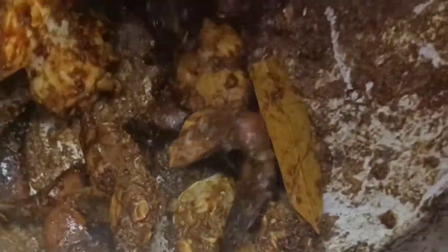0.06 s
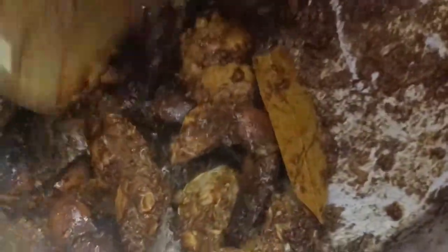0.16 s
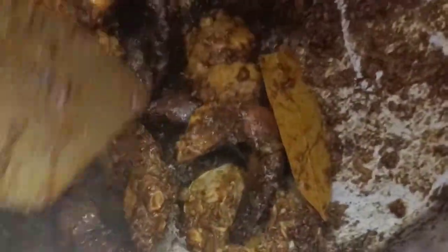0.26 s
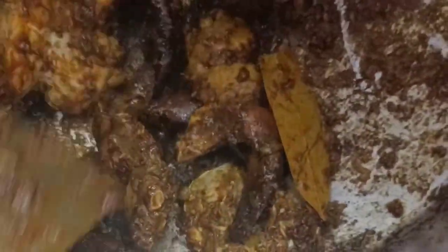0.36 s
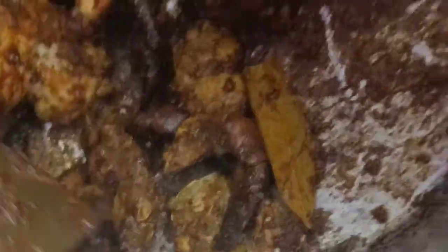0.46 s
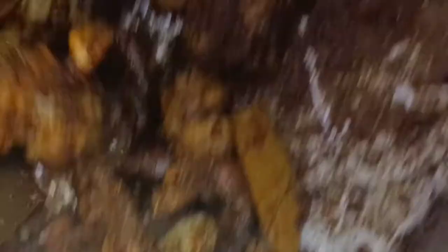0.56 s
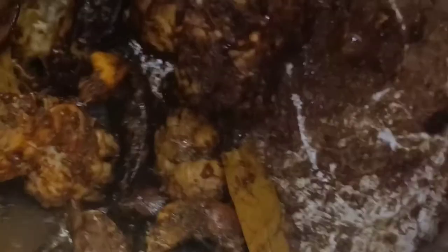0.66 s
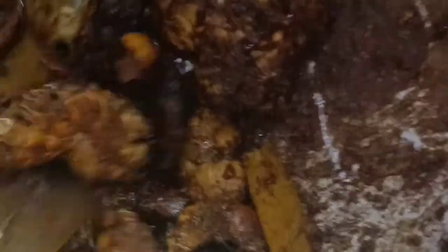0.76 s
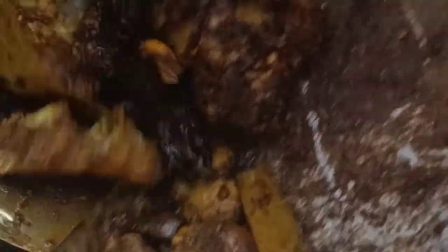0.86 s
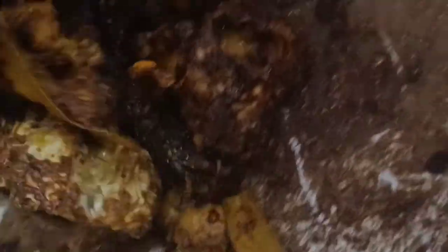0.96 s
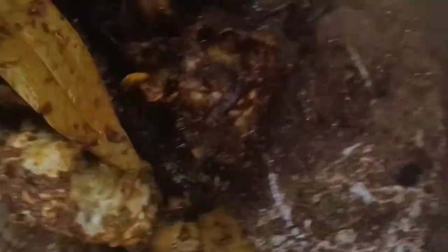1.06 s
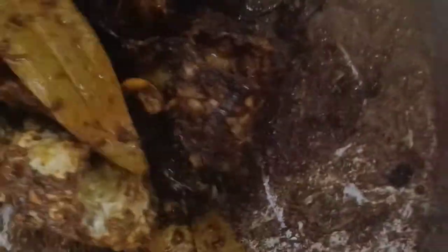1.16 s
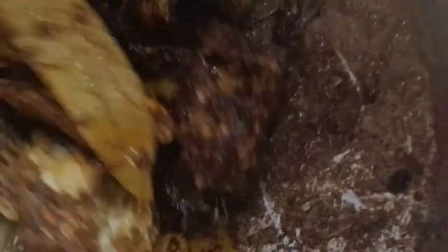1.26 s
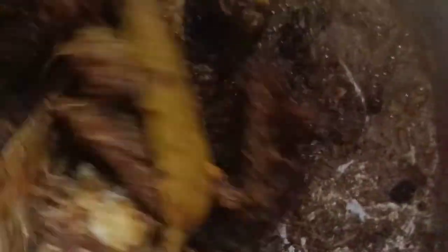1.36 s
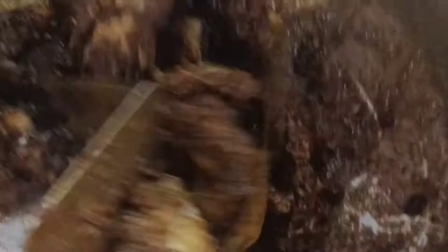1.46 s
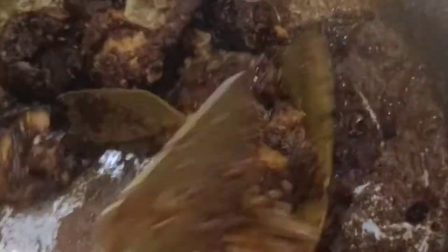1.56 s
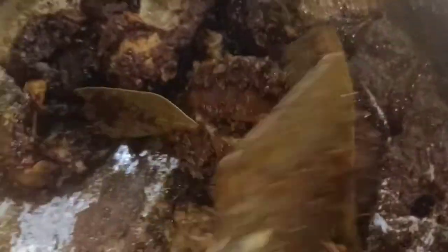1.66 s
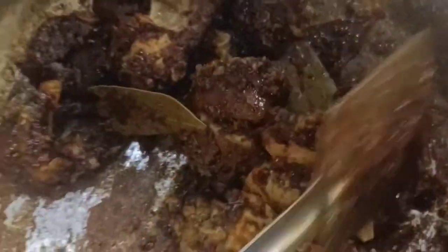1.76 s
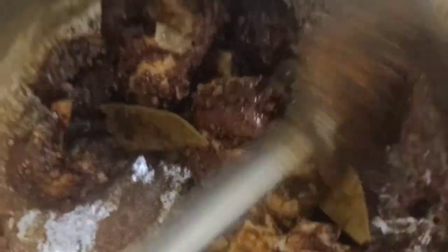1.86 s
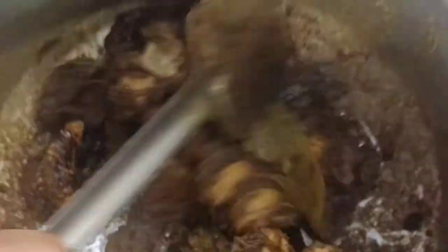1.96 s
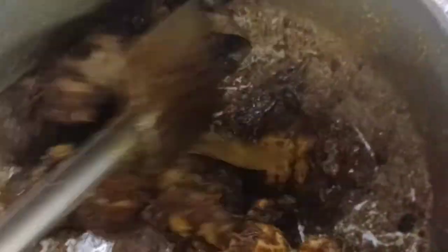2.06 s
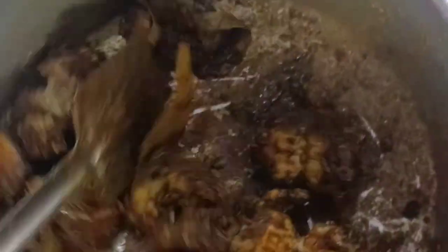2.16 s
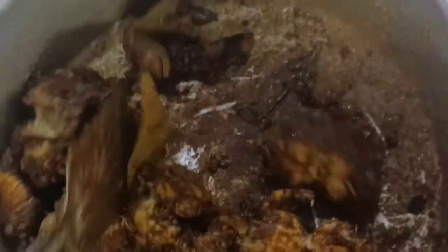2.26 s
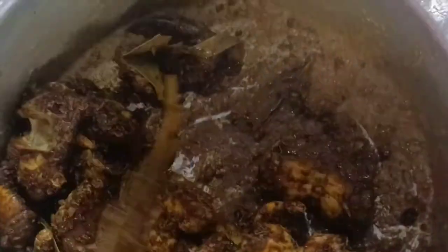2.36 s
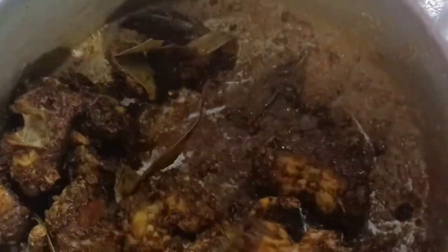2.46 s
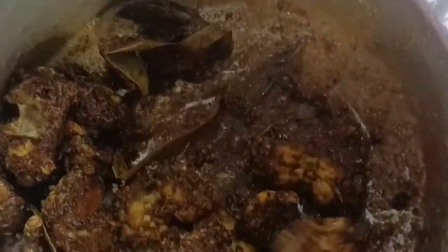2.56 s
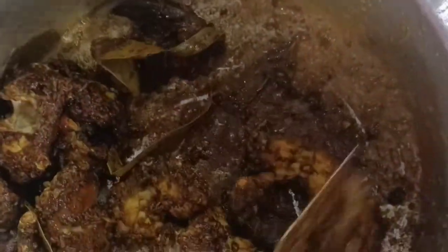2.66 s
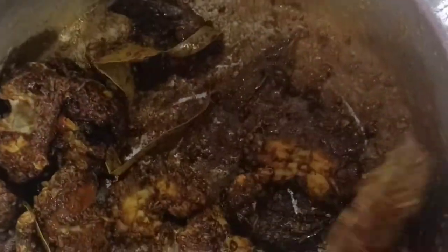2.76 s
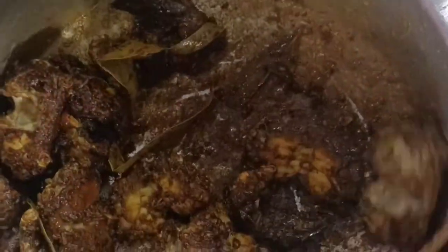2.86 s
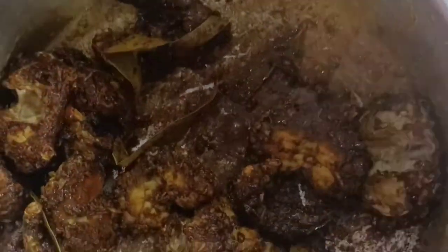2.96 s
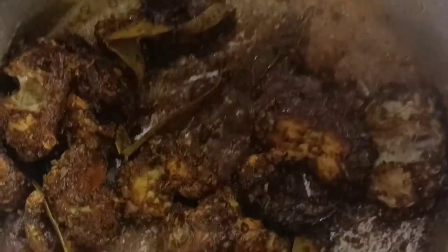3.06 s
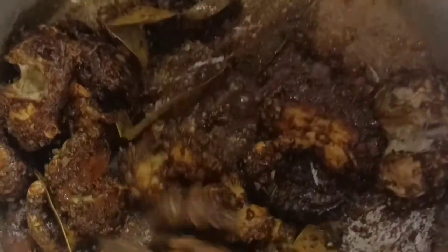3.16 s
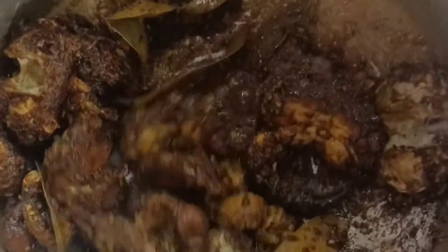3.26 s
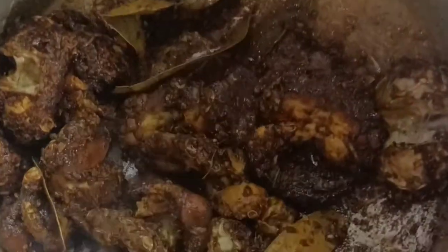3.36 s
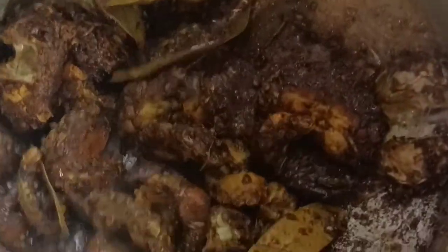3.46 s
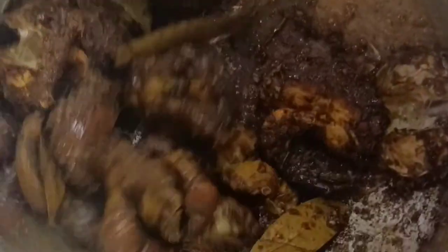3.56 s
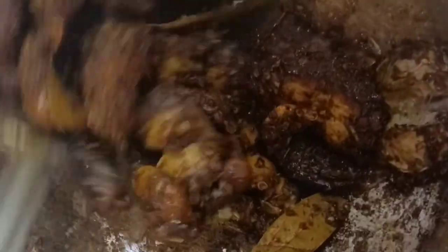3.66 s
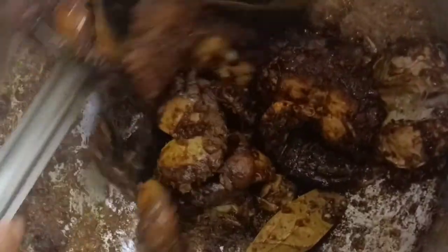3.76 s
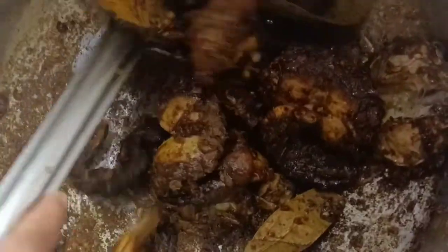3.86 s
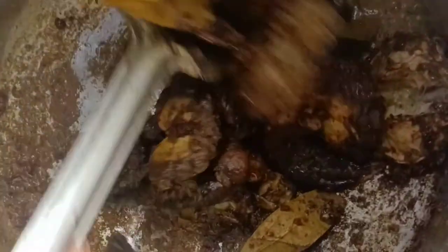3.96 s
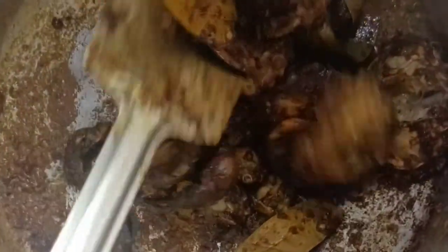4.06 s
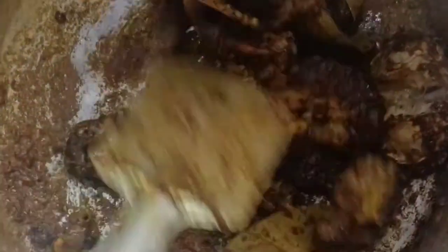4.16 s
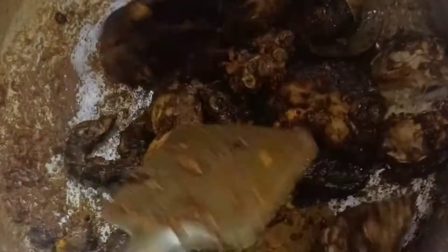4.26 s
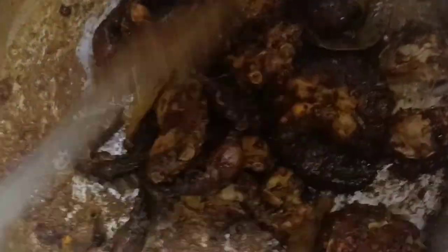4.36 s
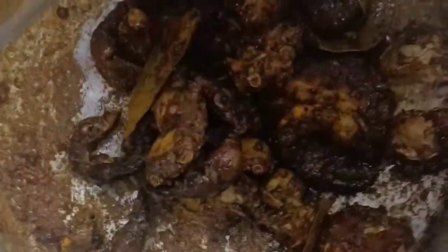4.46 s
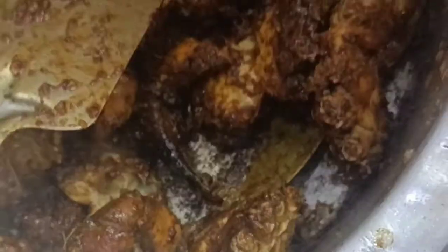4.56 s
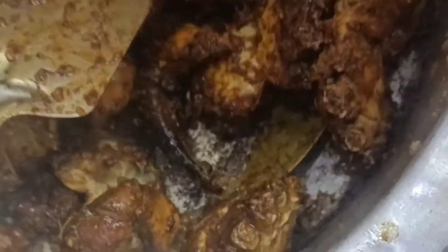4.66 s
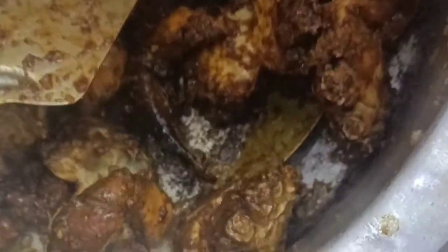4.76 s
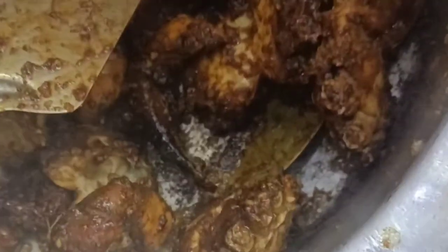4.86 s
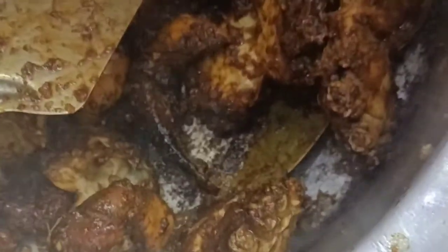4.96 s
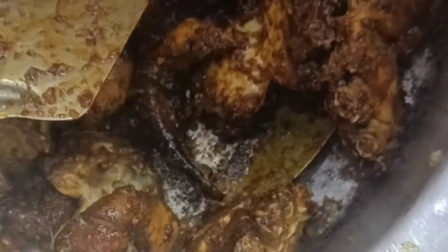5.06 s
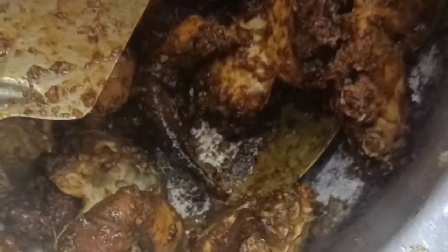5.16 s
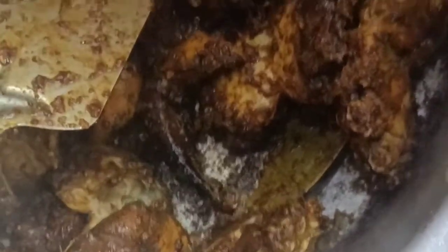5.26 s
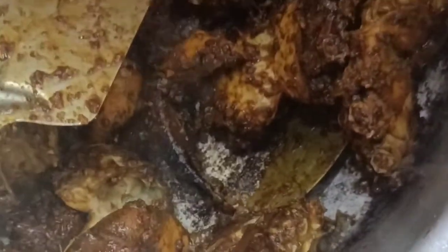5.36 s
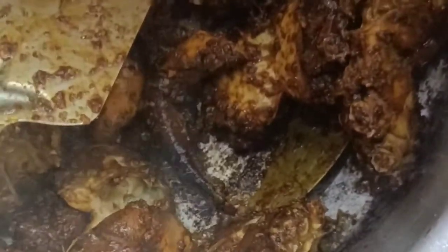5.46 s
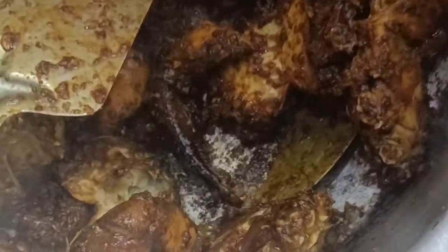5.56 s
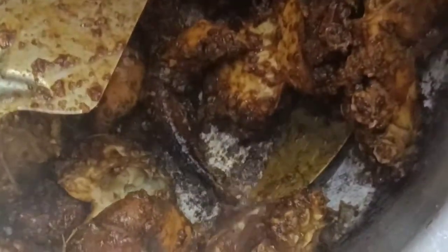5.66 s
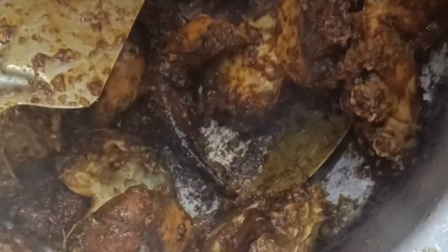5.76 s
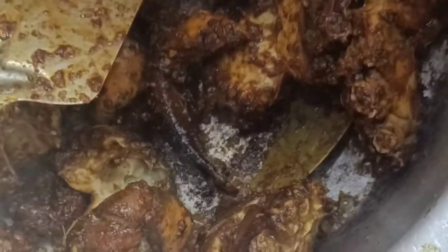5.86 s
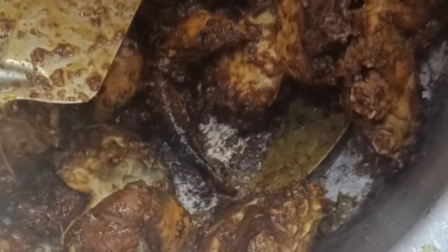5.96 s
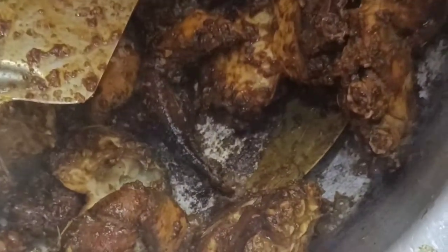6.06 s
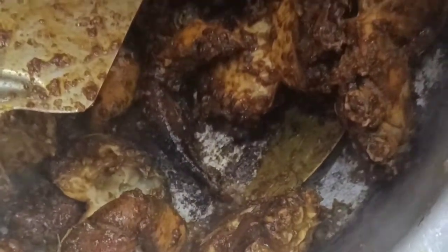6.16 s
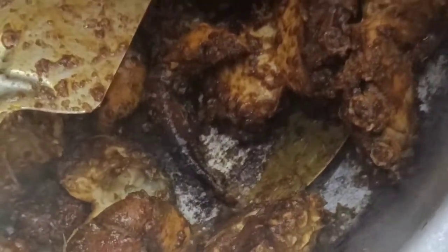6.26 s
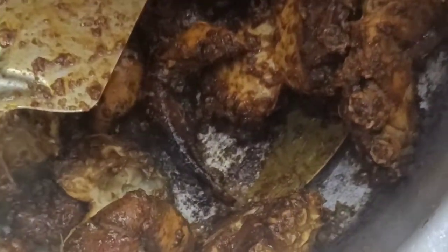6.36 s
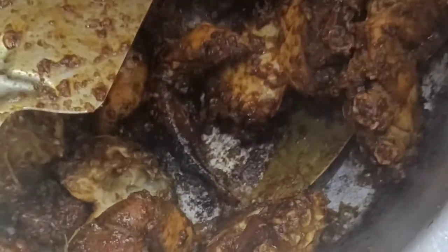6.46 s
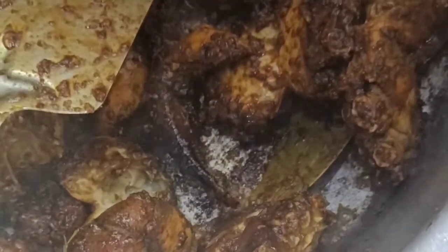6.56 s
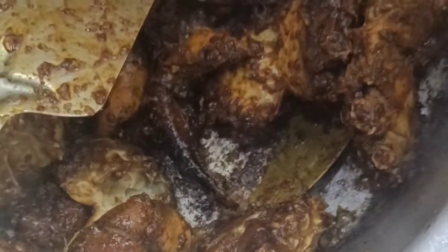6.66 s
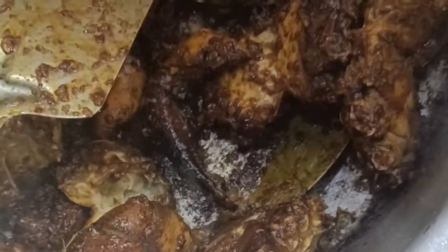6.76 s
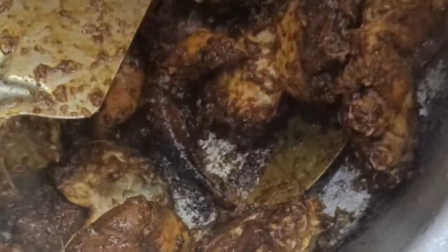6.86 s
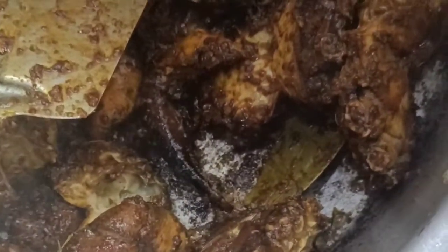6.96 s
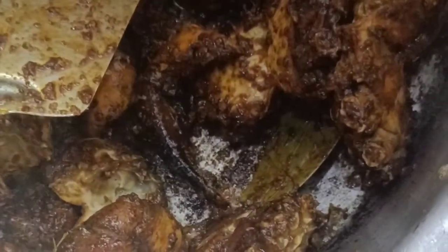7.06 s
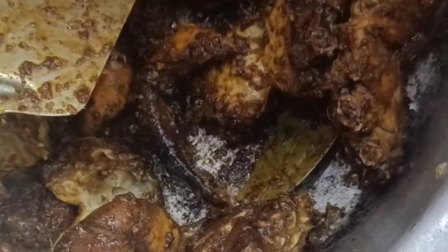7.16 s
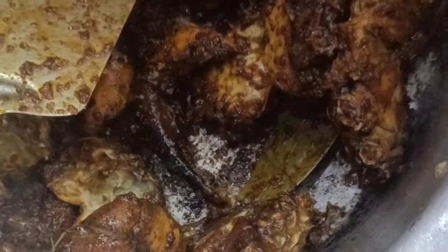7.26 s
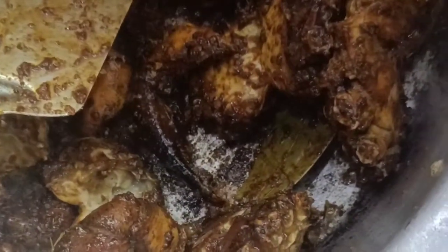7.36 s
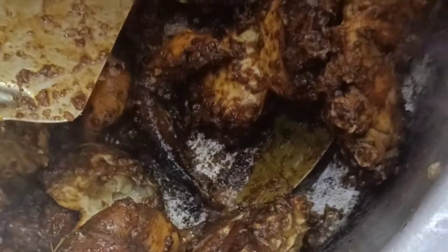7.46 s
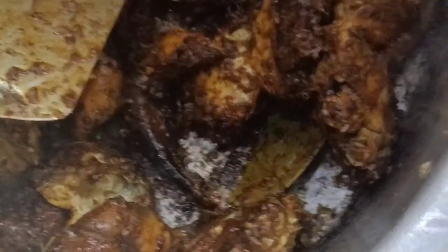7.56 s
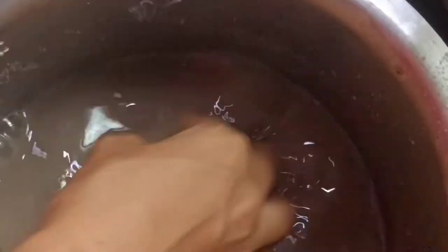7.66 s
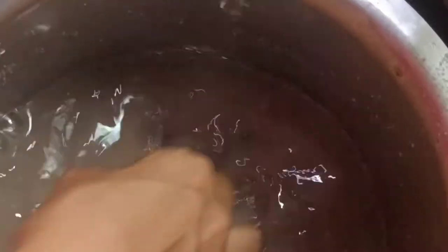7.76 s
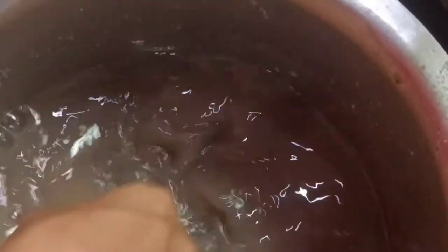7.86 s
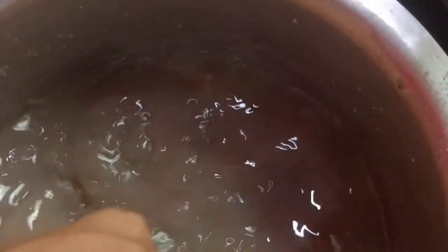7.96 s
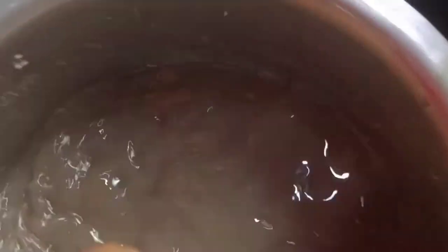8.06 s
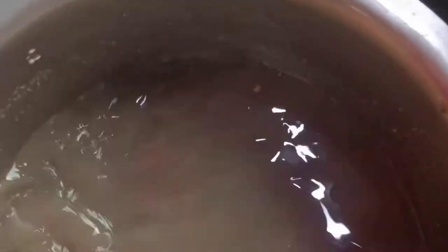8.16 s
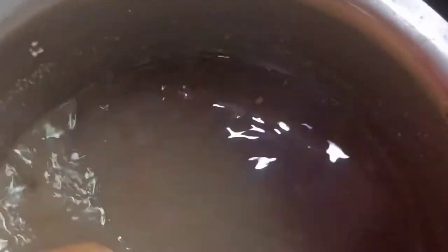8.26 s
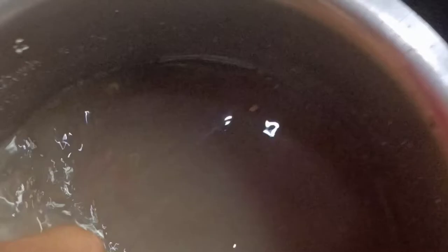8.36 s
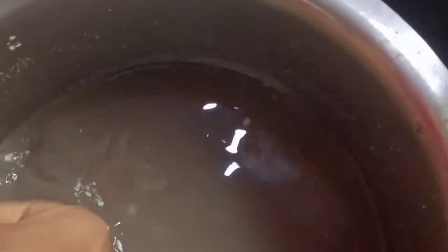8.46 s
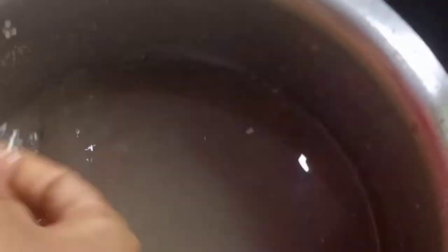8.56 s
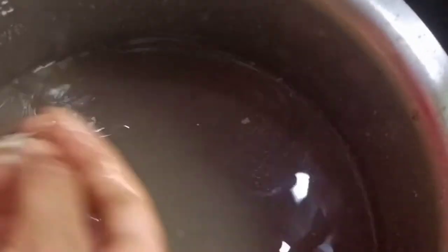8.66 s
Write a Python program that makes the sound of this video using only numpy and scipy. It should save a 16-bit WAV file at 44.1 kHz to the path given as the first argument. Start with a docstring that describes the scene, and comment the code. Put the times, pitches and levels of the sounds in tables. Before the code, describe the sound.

Very close to a deep metal pan, a steel spatula bites, scrapes and clanks over a crusted bottom while pieces of food thud back and oil sizzles steadily. After about four seconds stirring mostly stops; two late scratches, spitting drops and a bright steam hiss on the right follow. The spatula rocks softly on the rim, then the sizzle falls abruptly to a quiet, even simmer.

```python
"""A steel spatula knocks, scrapes and turns curry fries in a deep metal pan close to the microphone.
Bursts of noise ring the modes of pan and blade; the spatula is later laid down and rocks on the rim.
The fries sizzle as countless tiny bursts, drops spit and steam hisses from under the food on the right.
Near the end the frying falls to a quiet simmer; burner rush (shaped noise) and mains hum lie underneath."""
import sys
import numpy as np
from scipy import signal
from scipy.io import wavfile
from scipy.ndimage import uniform_filter1d

SR = 44100
rng = np.random.default_rng(int(sys.argv[2]) if len(sys.argv) > 2 else 0)


def generate_wav(sig):
    """Save sig (samples, or channels by samples) to the path in sys.argv[1] as 16-bit PCM at SR."""
    pcm = np.round(np.clip(np.atleast_2d(sig).T, -1, 1) * 32767).astype(np.int16)
    wavfile.write(sys.argv[1], SR, pcm)


N = 384111
TIME = np.arange(N) / SR   # seconds

# The bare edge bites into the metal. Each row: start in seconds, scratch level in dB, blade resonance
# in Hz, scratch centre in Hz, chatter t60 in seconds, ring t60 in seconds.
EDGE_BITES = [(0.167, -17, 1022, 5770, 0.13, 0.04), (0.381, -25, 1017, 4020, 0.092, 0.17),
              (0.901, -16, 2100, 2860, 0.058, 0.028), (0.921, -24.5, 1320, 3020, 0.028, .04),
              (1.55, -24, 1040, 5100, 0.028, 0.087), (1.66, -16.5, 900, 4970, 0.068, 0.058),
              (1.736, -24, 1180, 5240, 0.036, .06), (1.862, -36.5, 1580, 4950, 0.039, .05),
              (2.21, -30.5, 2160, 4000, 0.013, 0.024), (2.539, -25, 1546, 5240, 0.58, .1),
              (2.577, -18, 907, 6200, 0.079, 0.13), (2.596, -19, 895, 5630, 0.15, 0.14),
              (2.657, -21, 940, 5070, 0.082, 0.044), (2.713, -28.5, 1540, 4700, .12, .06),
              (3.012, -25.5, 1270, 4670, 0.0045, .02), (3.309, -15, 1720, 3830, 0.021, .04),
              (3.332, -18, 1780, 4830, 0.054, .05), (3.875, -21.5, 1520, 3140, 0.039, .03),
              (4.058, -33.5, 2180, 3600, .02, .02), (4.952, -17.5, 1230, 6300, 0.028, 0.036),
              (4.962, -23.5, 1240, 4100, 0.034, .03), (5.087, -20.5, 1430, 4200, 0.066, 0.11)]
# The flat of the blade strikes the bottom. Each row: start in seconds, clank level in dB,
# blade resonance in Hz.
FLAT_CLANKS = [(0.584, -32, 1020), (0.711, -27, 1590), (0.741, -26, 1310), (0.756, -25.5, 1340),
               (0.776, -30, 1640), (0.873, -34.5, 1610), (1.737, -16, 1122), (1.814, -27, 1830),
               (2.719, -25.5, 825), (2.871, -27, 1130), (2.919, -21, 1160), (2.955, -37, 940),
               (2.986, -29.5, 1250), (3.35, -20, 1270), (3.383, -32, 1270), (3.426, -26.5, 2070),
               (3.443, -19, 1260), (3.464, -25, 1680), (3.484, -28, 1460), (3.549, -28, 1540),
               (3.577, -28, 950), (3.9, -25, 1050), (3.909, -18, 1530), (3.981, -29, 1040)]
# Low thuds: pieces of food drop back into the pan; at 1.742 the pan itself thumps on its stand.
# Each row: start in seconds, thud level in dB, thud pitch in Hz.
LOW_THUDS = [(0.181, -41, 336), (0.332, -39, 293), (0.521, -35.5, 278), (0.923, -40, 307),
             (1.161, -38.5, 262), (1.218, -29, 283), (1.472, -28, 310), (1.58, -30.5, 278),
             (1.689, -33, 270), (1.742, -28.5, 98), (2.023, -38, 270), (2.324, -36, 255), (2.838, -35, 320),
             (2.891, -23.5, 385), (2.922, -26, 425), (3.873, -20.5, 325), (3.899, -19.5, 474),
             (4.211, -39, 415)]
# Strokes of the spatula over the bottom. Each row: start in seconds, length in seconds, rise in seconds,
# grating edge in dB, pushed food in dB, blade resonance in Hz, its strength in dB, top of the grating
# in Hz. The three dB columns are before the trims in scraping().
SPATULA_STROKES = [(0.236, 0.086, 0.027, -33, -62, 993, 12, 4500),
                   (0.306, 0.11, 0.015, -35.5, -33, 1910, 11.5, 3500),
                   (0.516, 0.062, 0.048, -30, -35.5, 1950, 21, 2600),
                   (0.566, 0.03, 0.017, -40, -39, 1083, 24.5, 2600),
                   (0.678, 0.05, 0.034, -24.5, -45, 1330, 22, 3230),
                   (1.652, 0.066, 0.011, -24, -22, 915, 19, 4000),
                   (1.756, 0.071, 0.012, -30, -26.5, 1990, 2, 2400),
                   (1.857, 0.013, 0.0067, -26.5, -34.5, 1540, 7, 2600),
                   (2.534, 0.026, 0.0034, -31.5, -42, 1580, 2, 4960),
                   (2.585, 0.14, 0.01, -28.5, -36, 920, -4, 5000),
                   (2.794, 0.22, 0.056, -28.5, -26, 800, 6, 1610),
                   (3.275, 0.19, 0.046, -18.5, -36, 1977, 14, 2420),
                   (3.447, 0.053, 0.014, -25, -26.5, 1860, 8, 2190),
                   (3.523, 0.04, 0.017, -25.5, -34, 1470, 15, 1780),
                   (3.88, 0.15, 0.015, -38, -28.5, 1520, 14, 2220)]
# Modes of the loaded pan. Each row: frequency in Hz, width in Hz, gain in dB.
PAN_MODES = [(246, 7, 9.5), (283, 32, 8.5), (359.7, 21, 5.5), (405, 31, -0.5), (539, 34, -14), (567, 32, 0),
             (732, 92, -3.5), (1000, 80, 5), (1035, 14, -4), (1204, 75, -1.5), (1394, 27, 0.5),
             (1580, 240, 8.5), (1870, 100, 4), (2002, 17, 10), (2400, 210, -28), (2390, 530, 2.5),
             (2740, 17, -18), (3250, 9, 7), (3770, 73, 1), (4580, 61, 8), (4950, 13, 1), (6080, 54, 7),
             (6840, 200, 4), (8300, 24, 4)]
# High modes of the steel blade. Each row: frequency in Hz, width in Hz, gain in dB before bend and spot.
BLADE_MODES = [(2144, 78, 3.5), (2946, 65, 1.5), (3265, 40, 2), (3500, 49, -2), (3770, 48, -5),
               (4220, 84, -9), (4635, 74, -0.5), (5500, 45, -10), (5890, 53, 4), (6370, 200, -1),
               (8360, 100, -1), (8640, 33, 0.5), (9400, 120, -29)]
# The laid-down spatula rocks against the rim. Each row: start in seconds, level in dB,
# chatter t60 in seconds, hardness of the contact as its upper limit in Hz.
RIM_ROCKS = [(6.013, -32.5, 0.26, 290), (6.094, -36, 0.17, 900), (6.204, -33, 0.28, 1600),
             (6.244, -38.5, 0.26, 1900)]
# Modes of its handle. Each row: frequency in Hz, width in Hz of each of two passes, gain in dB.
HANDLE_MODES = [(180, 64, 1.5), (267, 23, 10.5), (683, 33, -0.5), (785, 39, -5), (1160, 40, 1),
                (1340, 80, -14), (1636, 77, -2)]
# Vigour of the frying. Each row: time in seconds, level in dB before FRY_GAIN_DB.
FRYING_VIGOUR = [(0.0, -40), (0.36, -41), (0.59, -40.5), (1.15, -40.5), (1.73, -39.5), (2.07, -42.5),
                 (2.83, -41.5), (3.19, -39), (4.12, -40.5), (4.44, -41.5), (6.27, -41), (6.57, -43),
                 (6.99, -41), (7.15, -43)]
# Colour of the frying ahead of the pan. Each row: frequency in Hz, level in dB per Hz.
FRYING_COLOUR = [(300, -16), (700, -16), (1200, -9.5), (1900, -10.5), (2600, 1.6), (3200, 2.5), (4200, 2),
                 (6000, 4.5), (9000, 0), (12000, 2), (15500, 3.5)]
# Fat or sauce spits with no body. Each row: start in seconds, level in dB, centre in Hz, t60 in seconds.
FAT_SPITS = [(4.918, -20, 11000, 0.033), (5.885, -26, 11000, .008), (5.97, -34, 11000, 0.023),
             (6.039, -16.5, 10000, 0.026), (6.186, -15.5, 7000, 0.01), (6.205, -21.5, 8500, 0.47),
             (6.402, -27, 9500, 0.086), (8.216, -37, 4500, 0.14)]
# Flow of steam from under the food. Each row: time in seconds, level in dB before STEAM_GAIN_DB and pan.
STEAM_FLOW = [(4.22, -37), (4.32, -40), (4.39, -45), (4.51, -34), (4.68, -40.5), (4.76, -38), (5.02, -37),
              (5.2, -36), (5.33, -34), (5.47, -37.5), (5.75, -35.5), (6.0, -32.5), (6.14, -36), (6.21, -35),
              (6.32, -34.5), (6.48, -36), (6.57, -32), (6.65, -39.5), (6.96, -41), (7.1, -37.5)]
# Short spurts above that flow. Each row: start in seconds, length in seconds, level in dB before the same.
STEAM_SPURTS = [(4.296, 0.01, -37), (5.303, 0.015, -32.5)]
# The steam's narrow ways out. Each row: frequency in Hz, width in Hz of each of two passes, gain in dB.
STEAM_VENTS = [(8430, 550, 5.5), (10100, 13000, -5), (10950, 3300, -0.5)]
# Colour of the burner. Each row: frequency in Hz, relative level in dB per Hz.
BURNER_COLOUR = [(25, -50), (45, 6.5), (65, 2.5), (110, 0.5), (160, -4), (280, -10), (420, -10), (700, -21),
                 (1200, -29)]
# Likeness of left and right. Each row: frequency in Hz, correlation.
LEFT_RIGHT_LIKENESS = [(30, 0.97), (130, 0.88), (300, 0.91), (640, 0), (1400, 0), (3000, 0), (15000, 0)]
# Colour of the left microphone port. Each row: frequency in Hz, width in Hz, gain in dB.
LEFT_MIC_PORT = [(7800, 1400, -2.5), (14800, 1700, 4.5)]
# Colour of the right microphone port. Each row: frequency in Hz, width in Hz, gain in dB.
RIGHT_MIC_PORT = [(6520, 2500, -11), (8580, 5900, 9.5), (15600, 4500, -8.5)]

BLOW_ATTACK_S = .0018
BITE_THUD_HZ, CLANK_THUD_HZ = 306, 468   # pitch of the thud under a bite and under a clank
BITE_THUD_DB, BITE_CLANK_DB = -22.5, -11   # relative to the scratch, before the glance
GLANCE_DB_PER_OCTAVE = 2   # a brighter, more glancing bite stirs blade and pan less
CLANK_THUD_DB, CLANK_SCRATCH_DB, CLANK_T60_S = -13.5, -8.5, 0.03   # dB relative to the clank
THUD_CLANK_DB, THUD_SCRATCH_DB = -12.5, -11.5   # relative to the thud
THUD_T60_S, THUD_BLADE_HZ = 0.038, 1304
DULL_SCRATCH_HZ = 3850   # centre of the scratch in clanks and thuds
STRUCK_BLADE_DB, STRUCK_BLADE_T60_S = 6.5, 0.028   # first contact, relative to the chatter
STRUCK_THUD_DB, STRUCK_THUD_T60_S = 0.5, 0.045
# the blade's modes, their change from blow to blow, the bare contact
BLADE_RING_DB, BLADE_SPOT_DB, SCRATCH_DIRECT_DB = 0, 2.5, -8.5
BLADE_BEND_OCTAVES = .035
PLACES_PER_S = 11   # how often a sliding blade reaches a spot that rings differently
GRATING_HZ = np.geomspace(640, 7240, 8)
SAG_DB_PER_S, RELEASE_DB_PER_S = 43, 175   # the hand eases off; lifting adds the second rate
STIR_FROM_S, STIR_TO_S = 0.116, 4.09   # light stirring between strokes
STIR_EDGE_DB, STIR_FOOD_DB = -61.5, -52.5   # before the trims in scraping()
SHIFT_S, SHIFT_LENGTH_S, SHIFT_RISE_S, SHIFT_DB = 1.735, 0.14, 0.017, -30.5   # pan shifts on its stand
# the spatula's weight lands first with a soft thump; dB relative to the rock's level
ROCK_THUMP_DB, ROCK_THUMP_HZ, ROCK_THUMP_T60_S = -2.5, 266, 0.13
FRY_GAIN_DB, STEAM_GAIN_DB = 9.5, 1
SIMMER_FROM_S, SPURT_RISE_S = 7.172, 0.018
MAINS_HZ, HUM_DB, OVERTONE_DB = 96.3, -60, -64
CUTOFF_HZ = 15500


def knocks(count=11000, size=660):
    """Each blow is a contact that chatters away as a low thud, a clank and a scratch of the blade."""
    out = np.zeros((2, N + count))
    t = np.arange(count) / SR
    chatter = grains(1100, spread_db=2.0, length_s=0.0015)
    for s, thud_db, thud_hz, clank_db, clank_hz, scratch_db, scratch_hz, t60, ring_t60 in blows():
        at = int(s * SR)
        first_touch = from_db(4) * np.exp(-t / 0.0022)
        contact = first_touch + from_db(-60 * t / t60) * np.roll(chatter, -at)[:count]
        force = rng.standard_normal((2, count)) * contact * (1 - np.exp(-t / BLOW_ATTACK_S))

        low = band(spread(force, 230), thud_hz / 1.68, thud_hz * 1.4, order=3)
        thud = pan(low, direct_db=4, place_db=-4.5)
        thud = thud / thud[:, :size].std()
        thud = thud + from_db(STRUCK_THUD_DB) * struck(t, thud_hz, STRUCK_THUD_T60_S)

        middle = band(spread(force, 920), clank_hz / 1.346, clank_hz * 1.63, order=3)
        clank = pan(middle, direct_db=-7, place_db=5)
        clank = clank + from_db(15.5) * blade_ring(middle, clank_hz, width_hz=113)
        clank = clank / clank[:, :size].std()
        clank = clank + from_db(STRUCK_BLADE_DB) * struck(t, clank_hz, ring_t60)

        scratch = blade_scratch(force, scratch_hz, t)
        for part, db, left_db in ((thud, thud_db, -.6), (clank, clank_db, .5), (scratch, scratch_db, 1.0)):
            onset_rms = np.sqrt(np.mean(part[:, :size] ** 2))
            out[:, at:at + count] += part / onset_rms * from_db(db + np.array([[left_db], [-left_db]]))
    return out[:, :N]


def blows():
    """Every contact with levels, pitches and t60s of thud, clank and scratch, by the balance of its kind."""
    for s, db, blade_hz, scratch_hz, t60, ring_t60 in EDGE_BITES:
        body_db = db - GLANCE_DB_PER_OCTAVE * np.log2(scratch_hz / 5000)
        yield (s, body_db + BITE_THUD_DB, BITE_THUD_HZ, body_db + BITE_CLANK_DB, blade_hz,
               db, scratch_hz, t60, ring_t60)
    for s, db, blade_hz in FLAT_CLANKS:
        yield (s, db + CLANK_THUD_DB, CLANK_THUD_HZ, db, blade_hz,
               db + CLANK_SCRATCH_DB, DULL_SCRATCH_HZ, CLANK_T60_S, STRUCK_BLADE_T60_S)
    for s, db, thud_hz in LOW_THUDS:
        yield (s, db, thud_hz, db + THUD_CLANK_DB, THUD_BLADE_HZ,
               db + THUD_SCRATCH_DB, DULL_SCRATCH_HZ, THUD_T60_S, STRUCK_BLADE_T60_S)


def blade_scratch(force, scratch_hz, t):
    """The bright part of the contact rings the blade's high modes; each grip bends them a little."""
    crack = from_db(7.0) * (scratch_hz / 6000) ** 3 * force * np.exp(-t / 0.011)   # top treble dies first
    bright = band(spread(force, scratch_hz), scratch_hz / 1.324, scratch_hz * 1.476)
    bright = bright + band(crack, 3100, 14400)
    scratch = from_db(SCRATCH_DIRECT_DB) * bright
    for (hz, width_hz, db), (spot, bend) in zip(BLADE_MODES, rng.standard_normal((len(BLADE_MODES), 2))):
        gain = from_db(BLADE_RING_DB + db + BLADE_SPOT_DB * spot)
        scratch = scratch + gain * resonate(bright, hz * 2 ** (BLADE_BEND_OCTAVES * bend), width_hz)
    return scratch


def struck(t, hz, t60):
    """The clean, decaying ring that the first contact sets off."""
    return np.sin(2 * np.pi * hz * t) * from_db(-60 * t / t60)


def pan(force, direct_db, place_db, sliding=False):
    """The pan's modes ring by where it is touched, shifting as the blade slides; the contact is heard too."""
    out = from_db(direct_db) * force
    for (hz, width_hz, db), places in zip(PAN_MODES, rng.standard_normal((len(PAN_MODES), 256))):
        gains = from_db(db + place_db * places)
        gain = np.interp(TIME * PLACES_PER_S, np.arange(len(gains)), gains) if sliding else gains[0]
        out += gain * resonate(force, hz, width_hz)
    return out


def blade_ring(x, hz, width_hz):
    """The blade's resonance, which can move with how it is pressed; gain 1 on top."""
    turn = np.exp(2j * np.pi * np.cumsum(hz * np.ones(x.shape[-1])) / SR)
    r = np.exp(-np.pi * width_hz / SR)
    around_zero = signal.lfilter([1 - r], [1, -r], x / turn + 1e-18)   # shifted down and smoothed
    return 2 * np.real(turn * around_zero)


def scraping():
    """The edge sticks and slips over the crusted bottom while the pieces it pushes tumble and thump."""
    on_edge, on_food, blade_hz, ring_db, top_hz = hand()
    edge = grate(top_hz)
    wavering_hz = blade_hz * (1 + 0.012 * drift(17))
    blade = from_db(ring_db + 7) * blade_ring(edge, wavering_hz, width_hz=50)
    bottom = pan(edge, direct_db=-7, place_db=7, sliding=True)
    grating = evened(bottom + blade) * on_edge * from_db(-2.0)

    tumbles = rng.standard_normal((2, N)) * grains(200, spread_db=1.5, length_s=0.0017)
    thumps = pan(band(spread(tumbles, 240), 195, 653), direct_db=-8.0, place_db=-1.0)
    pushing = evened(thumps) * on_food * from_db(-5.0)

    rumble = evened(band(spread(rng.standard_normal((2, N)), 100), 88, 104))
    shifting = rumble * push(SHIFT_S, SHIFT_LENGTH_S, SHIFT_RISE_S, SHIFT_DB)
    return pushing + grating + shifting


def hand():
    """Pressure on edge and food, blade pitch, ring and grating top: firm strokes over light, uneven stirring."""
    light = np.interp(TIME, [STIR_FROM_S, STIR_FROM_S + .02, STIR_TO_S, STIR_TO_S + .1], [0, 1, 1, 0])
    light = light * from_db(3.5 * drift(14))
    on_edge = light * from_db(STIR_EDGE_DB)
    on_food = light * from_db(STIR_FOOD_DB)
    for s, length_s, rise_s, edge_db, food_db, *_ in SPATULA_STROKES:
        stroke = push(s, length_s, rise_s, 0)
        on_edge = np.hypot(on_edge, stroke * from_db(edge_db))
        on_food = np.hypot(on_food, stroke * from_db(food_db))
    starts, *_, blade_hz, ring_db, top_hz = np.transpose(SPATULA_STROKES)
    now = np.maximum(np.searchsorted(starts, TIME) - 1, 0)   # latest stroke begun
    return on_edge, on_food, blade_hz[now], ring_db[now], top_hz[now]


def push(start_s, length_s, rise_s, db):
    """Gain of one push: it rises, sags while held, then dies away."""
    t = np.maximum(TIME - start_s, 0)
    sag_db = SAG_DB_PER_S * np.maximum(t - rise_s, 0)
    release_db = RELEASE_DB_PER_S * np.maximum(t - length_s, 0)
    return np.minimum(t / rise_s, 1) * from_db(db - np.minimum(sag_db + release_db, 200))


def grate(top_hz, steepness=3.0):
    """Tiny slips of the edge; sauce and food under the blade muffle them above top_hz."""
    slips = rng.standard_normal((2, 2, N)) * grains(170, spread_db=2.3, length_s=0.0021)
    out = 0
    for k, hz in enumerate(GRATING_HZ):
        half_octave = band(spread(slips[k % 2], hz), hz / 2 ** (1 / 4), hz * 2 ** (1 / 4))
        out = out + half_octave / np.sqrt(1 + (hz / top_hz) ** steepness)
    return out


def rocking(count=14000):
    """The resting spatula buzzes on the rim and its handle rings; harder contact reaches higher modes."""
    out = np.zeros((2, N))
    t = np.arange(count) / SR
    for s, level_db, t60, hard_hz in RIM_ROCKS:
        buzz = band(spread(rng.standard_normal((2, count)), 270), 60, hard_hz, order=1)
        ring = sum(from_db(db) * resonate(resonate(buzz, hz, width_hz), hz, width_hz)
                   for hz, width_hz, db in HANDLE_MODES)
        chatter = evened(ring, size=600) * (1 - np.exp(-t / 0.0052)) * from_db(-1.0 - 60 * t / t60)
        thump = from_db(ROCK_THUMP_DB) * struck(t, ROCK_THUMP_HZ, ROCK_THUMP_T60_S)
        at = int(s * SR)
        out[:, at:at + count] += from_db(level_db) * (chatter + thump)
    return out


def kitchen(x, t60=0.23, wall_hz=4000):
    """A short diffuse tail of decaying noise from the pot's wall and the room."""
    t = np.arange(SR // 2) / SR
    tail = band(rng.standard_normal((2, len(t))), 57, wall_hz, order=1)
    tail = spread(tail * from_db(-60 * t / t60) * (t > .004), 270)
    return signal.fftconvolve(x, tail / np.sqrt(np.sum(tail ** 2) / 2), axes=1)[:, :N]


def frying(simmer_db=-38.0, simmer_top_hz=14000):
    """Tiny bursts in the oil and larger spits, coloured by the pan; the simmer is duller."""
    s, db = np.transpose(FRYING_VIGOUR)
    hot = np.clip((SIMMER_FROM_S - TIME) / 0.01 + .5, 0, 1)   # 1 while frying, 0 in the simmer
    spits = from_db(-7) * grains(70, spread_db=2.6, length_s=0.009)
    inaudible = from_db(-50) * grains(9.9, spread_db=-6.0, length_s=0.00026)   # buried under the bursts
    fine = grains(4100, spread_db=0.5, length_s=0.015)
    bursts = rms_one(np.sqrt(fine ** 2 + spits ** 2 + inaudible ** 2))
    flutter = from_db(.9 * drift(20))
    fry = from_db(np.interp(TIME, s, db) + FRY_GAIN_DB) * flutter * bursts
    simmer = from_db(simmer_db + .5 * drift(12.0)) * grains(4600, spread_db=2.0, length_s=0.0098)
    strength = hot * fry + (1 - hot) * simmer
    sizzle = rms_one(pan(coloured(FRYING_COLOUR, strength), direct_db=11.0, place_db=0))
    sizzle = sizzle * np.sqrt(np.mean(strength ** 2))
    dull = band(sizzle, 100, simmer_top_hz, order=1)
    return (hot * sizzle + (1 - hot) * dull) * from_db([[.4], [-.2]])   # left, right


def spitting(count=13000, attack_s=0.00025):
    """Single drops flash into steam: a bright hiss that dies away."""
    out = np.zeros((2, N + count))
    t = np.arange(count) / SR
    for s, db, hz, t60 in FAT_SPITS:
        hiss = rms_one(band(rng.standard_normal((2, count)), hz / 2.3, hz * 2.5, order=1))
        at = int(s * SR)
        out[:, at:at + count] += hiss * (1 - np.exp(-t / attack_s)) * from_db(db - 60 * t / t60)
    return out[:, :N]


def steam():
    """Steam sputters from narrow gaps on the right, each fluttering by itself; the flow surges and breaks up."""
    hiss = 0
    for hz, width_hz, db in STEAM_VENTS:
        jet = rng.standard_normal(N) * from_db(1.8 * drift(49) + 1.5 * drift(12))
        hiss = hiss + from_db(db) * resonate(resonate(jet, hz, width_hz), hz, width_hz)
    bursts = np.hypot(1, .9 * grains(450, spread_db=2.4, length_s=.0012))
    sputter = rms_one(bursts * from_db(.5 * drift(14)))
    flow = level(STEAM_FLOW)
    for s, length_s, db in STEAM_SPURTS:
        flow = flow + push(s, length_s, SPURT_RISE_S, db)
    return rms_one(hiss) * sputter * flow * (TIME < SIMMER_FROM_S) * from_db([[-22], [4]])   # left, right


def background():
    """The burner's low rush of shaped noise and a mains hum with one overtone, slightly wavering."""
    phase = 2 * np.pi * MAINS_HZ * TIME + 1.1 * drift(0.22)
    waver = from_db(3 * drift(3))
    hum = from_db(HUM_DB) * waver * np.sin(phase) + from_db(OVERTONE_DB) * np.sin(2 * phase)
    return from_db(-55.0) * coloured(BURNER_COLOUR) + np.sqrt(2) * hum   # root 2: hum levels are rms


def from_db(db):
    """Decibels to gain."""
    return 10 ** (np.asarray(db) / 20)


def rms_one(x):
    """Scaled to an rms of 1."""
    return x / np.sqrt(np.mean(x ** 2) + 1e-20)


def evened(x, size=1500):
    """The same power from moment to moment, as from a steady hand, with the fine grain kept."""
    return x / np.sqrt(uniform_filter1d(np.mean(x ** 2, axis=0), size) + 1e-18)


def level(rows):
    """Gain along a dB curve, fading out just beyond its ends."""
    s, db = np.transpose(rows)
    outside = np.maximum(np.maximum(s[0] - TIME, TIME - s[-1]), 0)
    return from_db(np.interp(TIME, s, db)) * np.exp(-np.minimum(outside / 0.093, 6) ** 2)


def at_hz(points, hz):
    """Reads a (Hz, value) table on a log-frequency axis."""
    table_hz, values = np.transpose(points)
    return np.interp(np.log(hz), np.log(table_hz), values)


def band(x, low_hz, high_hz, order=2):
    """Butterworth band-pass."""
    edges = [low_hz, min(high_hz, .45 * SR)]
    return signal.sosfilt(signal.butter(order, edges, "band", fs=SR, output="sos"), x + 1e-18)


def resonate(x, hz, width_hz):
    """Two-pole resonance with gain 1 on top."""
    r = np.exp(-np.pi * width_hz / SR)
    poles = [1, -2 * r * np.cos(2 * np.pi * hz / SR), r * r]
    return signal.lfilter(np.array([1, 0, -1]) * (1 - r * r) / 2, poles, x + 1e-18)


def drift(rate):
    """Slow random wander of rms 1: noise smoothed twice on every 40th sample; a higher rate is faster."""
    r = np.exp(-80 * np.pi * rate / SR)
    slow = signal.lfilter([1], [1, -2 * r, r * r], rng.standard_normal(N // 40 + 2002))[2000:]
    return np.interp(np.arange(N) / 40, np.arange(len(slow)), rms_one(slow))


def grains(per_s, spread_db, length_s):
    """Envelope of tiny random bursts of uneven size, each dying at once; rms 1."""
    born = np.flatnonzero(rng.random(N) < per_s / SR)
    power = np.zeros(N)
    power[born] = from_db(spread_db * np.minimum(rng.exponential(1, len(born)), 5)) ** 2
    return rms_one(np.sqrt(signal.lfilter([1], [1, -np.exp(-2 / (length_s * SR))], power + 1e-12)))


def spread(pair, hz):
    """Two unrelated signals become left and right, alike in the bass only."""
    alike = np.clip(at_hz(LEFT_RIGHT_LIKENESS, hz), -.99, .99)
    return np.sqrt(1 + alike) * pair[0] + np.sqrt(1 - alike) * pair[1] * np.array([[1], [-1]])


def coloured(colour, envelope=1):
    """Stereo noise under an envelope, shaped by a bank of half-octave bands; rms 1."""
    white = rng.standard_normal((2, 2, N)) * envelope
    out = 0
    for k, hz in enumerate(2 ** np.arange(4.5, 14.1, .5)):
        if colour[0][0] / 2 < hz < colour[-1][0] * 2:
            half_octave = band(white[k % 2], hz / 2 ** (1 / 4), hz * 2 ** (1 / 4))
            out = out + from_db(at_hz(colour, hz)) * spread(half_octave, hz)
    return rms_one(out)


def scene():
    """The spatula close by with its echo, over the frying, the spits, the steam and the stove."""
    stirring = knocks() + scraping() + rocking()
    cooking = frying() + spitting() + from_db(STEAM_GAIN_DB) * steam()
    return stirring + from_db(-9.0) * kitchen(stirring) + cooking + background()


def port(x, bumps):
    """Peaks and dips of one microphone opening."""
    for hz, width_hz, db in bumps:
        middle = -2 * np.cos(2 * np.pi * hz / SR)
        half = np.tan(np.pi * width_hz / SR)
        g = from_db(db / 2)
        x = signal.lfilter([1 + half * g, middle, 1 - half * g], [1 + half / g, middle, 1 - half / g], x)
    return x


def record(dry):
    """Each microphone port colours its side, peaks are rounded, the top is cut."""
    heard = np.array([port(dry[0], LEFT_MIC_PORT), port(dry[1], RIGHT_MIC_PORT)])
    return signal.sosfilt(signal.ellip(12, .1, 80, CUTOFF_HZ, fs=SR, output="sos"), np.tanh(heard))


dry = scene()
out = record(dry)
generate_wav(out)
```